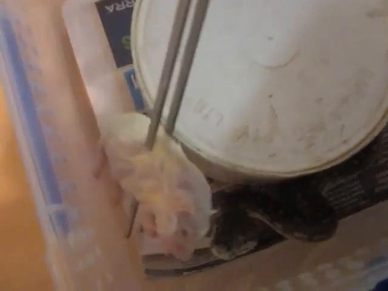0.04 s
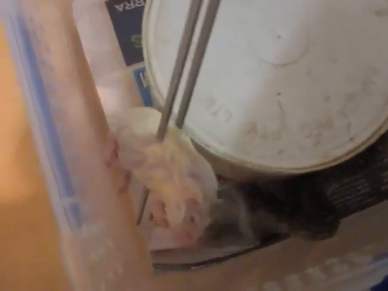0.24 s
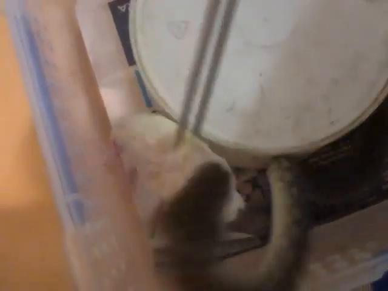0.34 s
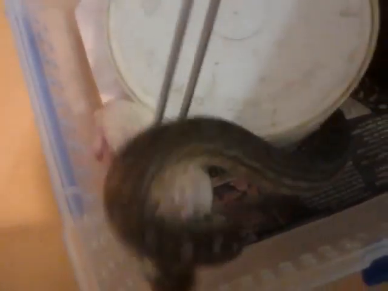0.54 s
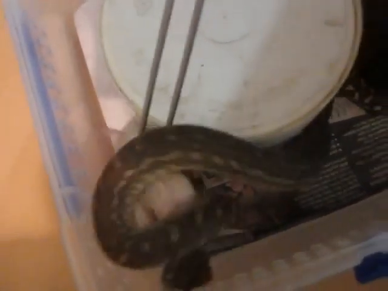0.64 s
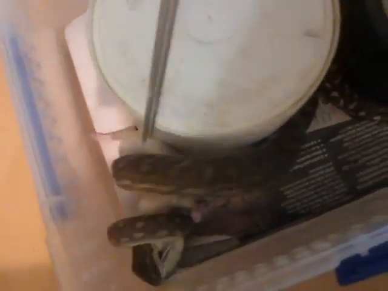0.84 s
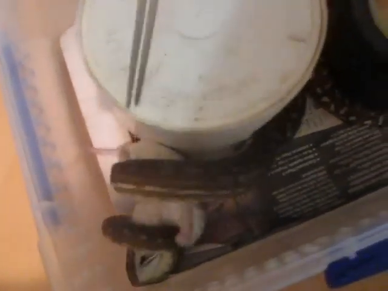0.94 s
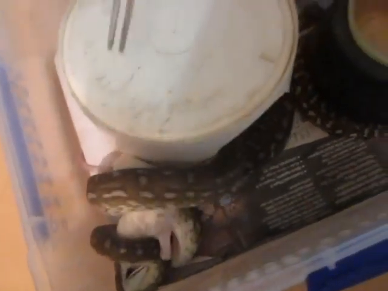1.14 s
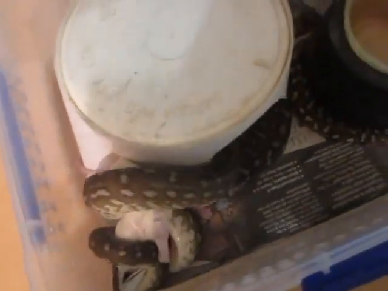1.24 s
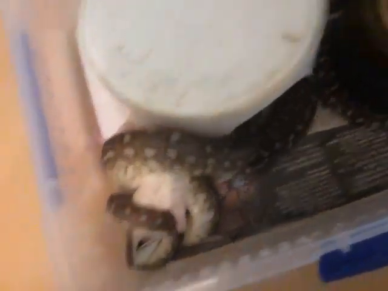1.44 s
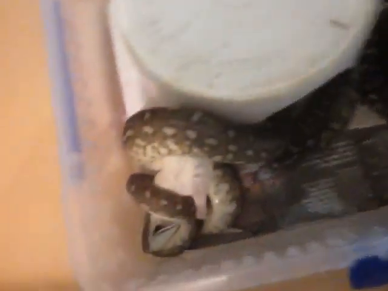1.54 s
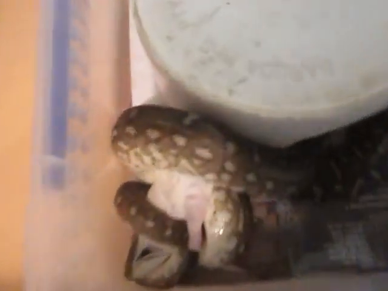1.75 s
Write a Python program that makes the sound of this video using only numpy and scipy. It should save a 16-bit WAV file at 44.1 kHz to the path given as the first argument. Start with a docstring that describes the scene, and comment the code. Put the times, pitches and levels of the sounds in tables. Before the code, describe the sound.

After a brief quiet hum, a snake lunges and coils, scuffing paper and thudding against plastic, ending with a hard crack; afterwards only droning room noise and faint tiny paper ticks, close, mono, lo-fi.

```python
"""Plastic tub lined with newspaper, close to a small camera, a droning room behind; a snake lunges and coils.
Scales drag over paper: crackling grains, tub scuffing and rumble follow level curves.
Blows ring the tub's modes and creases snap the paper sheet's modes, as decaying sines.
The camera's gain control drops after the hardest blow and creeps back."""
import sys
import numpy as np
from scipy import signal
from scipy.fft import rfft, irfft
from scipy.io import wavfile
from scipy.ndimage import uniform_filter1d

SR = 44100
rng = np.random.default_rng(int(sys.argv[2]) if len(sys.argv) > 2 else 0)


def invert_db(x):
    """Field ratio 10**(x/20) for x, a level in decibels (scalar or array-like)."""
    u = np.asarray(x, float) / 20
    return 10 ** u


def master_out(mix):
    """Clip the mix to full scale and print it as 16-bit PCM to the path in sys.argv[1]."""
    frames = np.transpose(np.atleast_2d(mix))
    ceiling = np.clip(frames, -1, 1)
    pcm = np.round(ceiling * 32767).astype(np.int16)
    wavfile.write(sys.argv[1], SR, pcm)


N = 79380  # 1.8 s


def evened(x):
    """Scales to rms 1."""
    return x / np.sqrt(np.mean(x ** 2) + 1e-20)


def coloured(x, spectrum):
    """Filters x by a (freq_hz, relative_db) table, interpolated over log frequency; rms 1."""
    table_hz, table_db = np.transpose(spectrum)
    hz = np.fft.rfftfreq(len(x), 1 / SR)
    gain_db = np.interp(np.log(hz + 1), np.log(table_hz + 1), table_db)
    return evened(irfft(rfft(x) * invert_db(gain_db), len(x)))


def add(mix, start_s, sound):
    """Mixes a sound in at start_s, cut at the end of the mix."""
    part = mix[round(start_s * SR):][:len(sound)]
    part += sound[:len(part)]


# Room noise spectrum: freq_hz [Hz], relative_db [dB per Hz]
ROOM_SPECTRUM = [(15, -71.5), (25, -18.5), (124, -13), (260, -3), (307, -11), (460, -15.5), (519, -13),
                 (691, -14.5), (1350, -17), (1930, -19.5), (5510, -26), (7520, -52), (9780, -89.5),
                 (16500, -120)]
# Droning noise bands: centre_hz [Hz], width_hz [Hz], level_db [dB]
DRONE_BANDS = [(202.5, 90, -59.5), (254.3, 21, -47.5), (276.9, 10, -52), (416.5, 46, -57), (727, 78, -57),
               (3070, 350, -61), (4150, 60, -66)]
# Thin steady tones: pitch_hz [Hz], level_db [dB]
WHINE_TONES = [(5708, -61.5), (6290, -67.5)]


def room():
    """Broad room noise, narrow droning bands as from an appliance, sines with slowly wandering phase."""
    room_db = -43
    hz = np.fft.rfftfreq(N, 1 / SR)
    out = invert_db(room_db) * coloured(rng.standard_normal(N), ROOM_SPECTRUM)
    for centre_hz, width_hz, level_db in DRONE_BANDS:
        resonance = 1 / (1 + (2 * (hz - centre_hz) / width_hz) ** 2)
        band = irfft(rfft(rng.standard_normal(N)) * resonance, N)
        out += invert_db(level_db) * evened(band)
    for pitch_hz, level_db in WHINE_TONES:
        drift_rad = np.cumsum(rng.standard_normal(N)) * 0.02
        tone = np.sin(2 * np.pi * pitch_hz * np.arange(N) / SR + drift_rad)
        out += invert_db(level_db) * np.sqrt(2) * tone
    return out


def ring(modes, centre_hz, octaves, jitter, rise_cycles):
    """Decaying sines of one struck object, strongest around centre_hz; soft onset, 1/6 s long."""
    jitter_db, jitter_rad, start_rad = 1.1, 0.4, 0.5  # random spread of mode level and phase from hit to hit
    t = np.arange(SR // 6) / SR
    mode_hz, mode_db, t60_s = np.transpose(modes)[:, :, None]
    level_db = mode_db - 6 * (np.log2(mode_hz / centre_hz) / octaves) ** 2 + jitter_db * jitter[:, :1]
    waves = np.sin(2 * np.pi * mode_hz * t + start_rad + jitter_rad * jitter[:, 1:])
    decaying = (invert_db(level_db - 60 * t / t60_s) * waves).sum(0)
    onset = 1 - np.exp(-(t * centre_hz / rise_cycles) ** 2)
    return decaying * onset / np.sqrt((invert_db(level_db) ** 2).sum()) / 2


# Creases snapping: start_s [s], strength_db [dB], centre_hz [Hz]
CREASE_SNAPS = [(0.2578, -17, 4800), (0.3001, -15.5, 2900), (0.308, -11.5, 2740), (0.4511, -7.5, 4960),
                (0.6293, -18, 3550), (0.8797, -8.5, 4400), (.8859, 6, 2400), (0.889, -6.5, 3300),
                (.8889, 3, 2500), (0.8897, 4, 3500), (0.8937, -15, 3500), (0.896, -16, 6000),
                (1.349, -21, 5300), (1.429, -43, 5300), (1.483, -34, 5300), (1.502, -21, 5300),
                (1.6065, -26, 2500), (1.621, -12.5, 4230), (1.6254, -32, 4500)]
# Paper sheet modes: mode_hz [Hz], mode_db [dB], t60_s [s]
SHEET_MODES = [(553, -2.5, 0.022), (920, -1, 0.023), (1650, 1, 0.012), (1890, -3.5, 0.01),
               (2580, -4.5, 0.0082), (3233, -0.5, 0.013), (3700, 3, 0.0065), (4230, 0.5, 0.0062),
               (4800, -4, 0.0059), (5300, -4, .007), (5540, -11.5, 0.016), (5830, -10, 0.018),
               (7340, -22.5, 0.0017)]


def snaps():
    """Each snap rings the sheet's modes around its centre, with slightly random levels and phases."""
    octaves, rise_cycles = 1.05, 0.91
    out = np.zeros(N)
    jitters = rng.standard_normal((len(CREASE_SNAPS), len(SHEET_MODES), 2))
    for (start_s, strength_db, centre_hz), jitter in zip(CREASE_SNAPS, jitters):
        add(out, start_s, invert_db(strength_db) * ring(SHEET_MODES, centre_hz, octaves, jitter, rise_cycles))
    return out


# Blows on the tub: start_s [s], strength_db [dB], centre_hz [Hz], spread [octaves]
TUB_BLOWS = [(0.2457, -13.5, 600, 1.4), (0.2506, -23.5, 300, 1.7), (0.2602, -40, 135, 0.22),
             (0.266, -13.5, 450, 1.2), (.2682, -35, 920, .3), (0.3056, -27, 500, 1.8),
             (0.3142, -20, 1500, 0.21), (0.434, -16.5, 400, 1.33), (0.4722, -36, 96, 0.35),
             (.4767, -22, 850, 0.23), (.5557, -10.5, 550, 0.96), (.5587, -35, 300, 1.34),
             (.5622, -10, 850, 0.78), (0.567, -20.5, 180, 0.65), (0.6249, -2, 1000, 0.47),
             (0.6271, -1.5, 750, 0.76), (.63, -15.5, 722, 1.4), (.6864, -13, 554, 0.78),
             (0.7739, -11, 490, 1.4), (0.8404, -25, 96, 0.22), (0.8477, -34.5, 350, 1.3),
             (0.8846, -9, 710, 0.48)]
# Tub modes: mode_hz [Hz], mode_db [dB], t60_s [s]
TUB_MODES = [(96, -4, 0.24), (135, -1.5, 0.3), (205, -8.5, 0.014), (322, -7, 0.067), (430.3, 1, 0.053),
             (560, 0, 0.027), (638, -5, 0.024), (815, -1, 0.035), (920, -6.5, 0.025), (1210, 2, 0.018),
             (1317, 2, 0.016), (1500, 3, 0.032), (1750, -17.5, 0.0047), (1950, -11.5, 0.034),
             (2730, -11, .015)]


def blows():
    """Each blow rings the tub's modes around its centre, with slightly random levels and phases."""
    rise_cycles = 0.3
    out = np.zeros(N)
    jitters = rng.standard_normal((len(TUB_BLOWS), len(TUB_MODES), 2))
    for (start_s, strength_db, centre_hz, octaves), jitter in zip(TUB_BLOWS, jitters):
        # minus: inverted polarity
        add(out, start_s, -invert_db(strength_db) * ring(TUB_MODES, centre_hz, octaves, jitter, rise_cycles))
    return out


def grains(lo_hz, hi_hz, per_s, count=24):
    """Short wave packets of many pitches at random moments, over a smooth noise bed."""
    spread_db, packet_cycles, smooth_share = 2.5, 3.38, 0.59
    out = np.zeros(N)
    for hz in np.geomspace(lo_hz, hi_hz, count):
        u = np.arange(0, 3, hz / SR / packet_cycles)  # time in units of packet_cycles periods
        packet = u * np.exp(-2 * u) * np.sin(2 * np.pi * packet_cycles * u) * hz / hi_hz
        size_db = spread_db * np.minimum(rng.exponential(1, N), 4)
        size = invert_db(size_db) * rng.choice([-1, 1], N)
        hits = rng.random(N) < per_s / count / SR
        out += signal.oaconvolve(size * hits, packet)[:N]
    bed = rng.standard_normal(N)
    return np.sqrt(1 - smooth_share) * evened(out) + np.sqrt(smooth_share) * bed


# Scales dragging: time_s [s], rustle_db [dB], scuff_db [dB], rumble_db [dB]
DRAG_LEVELS = [(0.249, -53, -78, -60), (0.261, -30, -31, -34.5), (0.27, -28.5, -24.5, -30),
               (0.29, -25, -40, -31), (.3, -21.5, -31, -37), (.312, -24.5, -26, -39),
               (0.324, -47.5, -58, -48), (0.356, -36.5, -44, -42.5), (.378, -50.5, -49, -50),
               (0.417, -38.5, -49, -55), (0.434, -37, -35.5, -36), (0.449, -26.5, -43, -42),
               (0.47, -42.5, -46, -58), (0.486, -39.5, -39.5, -59), (.53, -58, -68, -74),
               (.552, -66, -57, -37), (.574, -77, -43, -27.5), (.586, -79, -46, -32.5),
               (0.591, -42.5, -40, -55), (.621, -31.5, -51, -27.5), (.645, -44.5, -33.5, -28),
               (0.668, -42.5, -36, -38), (0.689, -49, -40, -38.5), (.706, -36.5, -49, -36),
               (.73, -44, -47, -40), (0.774, -42.5, -36.5, -50), (0.797, -34.5, -44, -42),
               (.816, -26.5, -29.5, -37.5), (0.831, -32.5, -36, -34.5), (.856, -34, -37, -34),
               (.874, -36.5, -43, -35.5), (.9, -40.5, -37, -50), (.915, -43.5, -57, -74),
               (.97, -48.5, -59, -59.5), (1.021, -43, -67, -68)]
# Spectra of paper rustle, tub scuffing, tub rumble: freq_hz [Hz], relative_db [dB]
PAPER_SPECTRUM = [(300, -25), (800, -18.5), (1500, -2), (2100, -5), (2800, 0.5), (3800, -6.5), (5000, -9.5),
                  (6500, -23), (7500, -47)]
SCUFF_SPECTRUM = [(200, -16.5), (400, -10), (600, 0), (900, -4.5), (1300, -9.5), (2000, -20), (3000, -27.5)]
RUMBLE_SPECTRUM = [(20, 2), (60, -11), (135, -0.5), (280, 0.5), (450, -6), (800, -45.5)]


def drag():
    """Paper crackles, the tub wall is scuffed and rumbles under the sliding body."""
    time_s, *levels_db = np.transpose(DRAG_LEVELS)
    rustle = coloured(grains(705, 6710, per_s=4500), PAPER_SPECTRUM)
    scuff = coloured(grains(336, 2520, per_s=2500), SCUFF_SPECTRUM)
    rumble = coloured(rng.standard_normal(N), RUMBLE_SPECTRUM)
    out = np.zeros(N)
    for layer, level_db in zip([rustle, scuff, rumble], levels_db):
        out += layer * invert_db(np.interp(np.arange(N) / SR, time_s, level_db, -90, -90))
    return out


def scene():
    """All sources at the microphone, one channel."""
    return (room() + snaps() + blows() + drag())[None]


def top_cut(x):
    """Nothing passes above the cut-off."""
    return signal.sosfilt(signal.butter(12, 7670, fs=SR, output="sos"), x)


# Circuit hiss spectrum: freq_hz [Hz], relative_db [dB per Hz]
HISS_SPECTRUM = [(100, 11), (1000, -1), (3200, 5), (5300, 5.5), (6500, -2.5), (7600, -38.5)]


def record(dry):
    """Gain drops at the heaviest sensed blow, holds, recovers; then circuit hiss, band limit, offset."""
    sense_hz, delay_s = 1500, 0.004
    duck_db, fall_s, hold_s, recover_s = -9, 0.006, 0.56, 0.42  # hold_s includes the fall
    mic_low_hz, hiss_db, edge_hz, offset = 33.5, -54, 7250, -0.0048
    sensed = signal.lfilter(*signal.butter(2, sense_hz, fs=SR), dry[0])
    peak = np.argmax(uniform_filter1d(sensed ** 2, size=300))
    since_s = (np.arange(N) - peak) / SR - delay_s
    fall = np.clip(since_s / fall_s, 0, 1)
    recovery = np.clip(1 - (since_s - hold_s) / recover_s, 0, 1)
    low_cut = signal.lfilter(*signal.butter(1, mic_low_hz, "high", fs=SR), dry)
    hiss = invert_db(hiss_db) * coloured(rng.standard_normal(N), HISS_SPECTRUM)
    wired = low_cut * invert_db(duck_db * fall * recovery) + hiss
    band_limit = signal.firwin(255, edge_hz, window=("kaiser", 9), fs=SR)
    mix = signal.oaconvolve(wired, band_limit[None], "same") + offset
    return top_cut(mix)


dry = scene()
out = record(dry)
master_out(out)
```